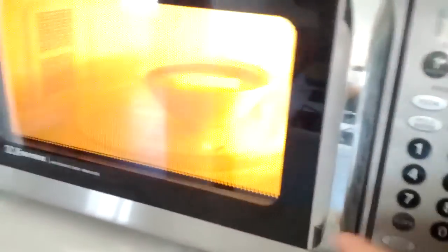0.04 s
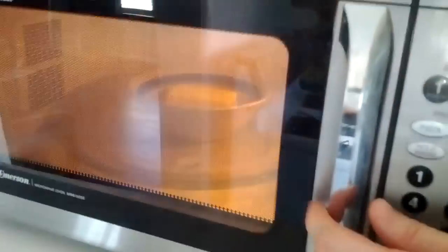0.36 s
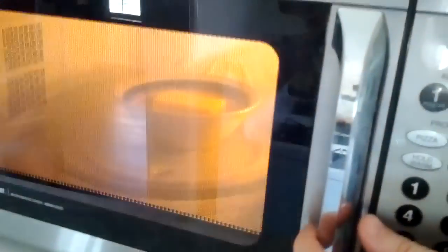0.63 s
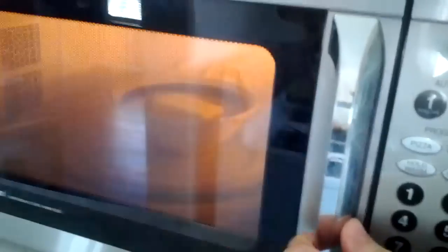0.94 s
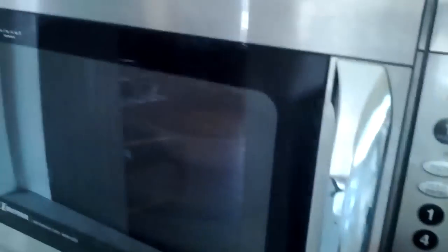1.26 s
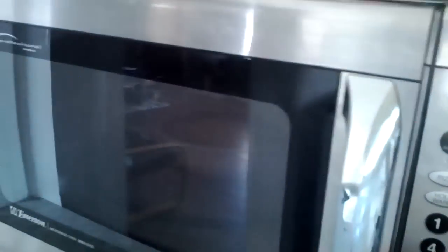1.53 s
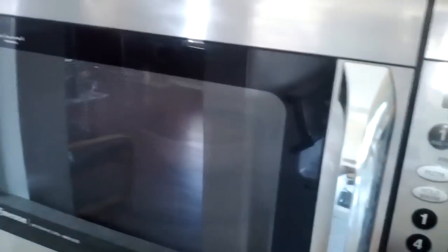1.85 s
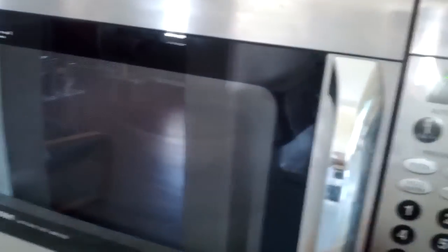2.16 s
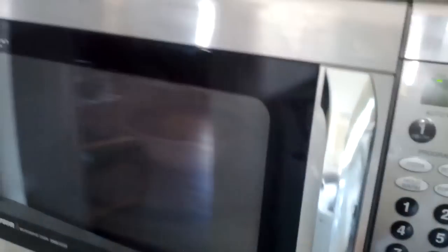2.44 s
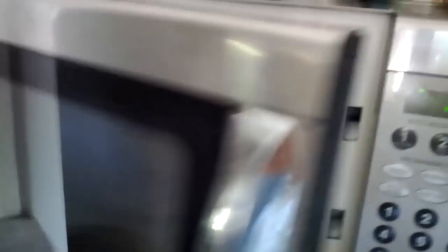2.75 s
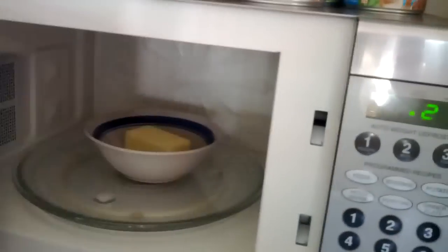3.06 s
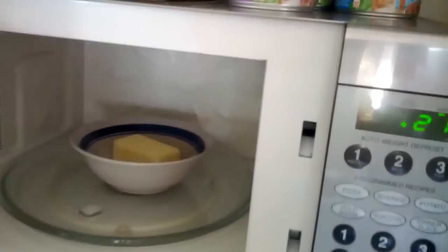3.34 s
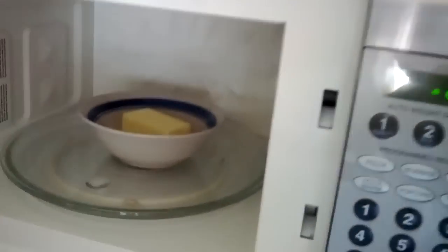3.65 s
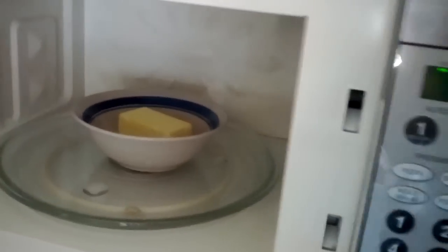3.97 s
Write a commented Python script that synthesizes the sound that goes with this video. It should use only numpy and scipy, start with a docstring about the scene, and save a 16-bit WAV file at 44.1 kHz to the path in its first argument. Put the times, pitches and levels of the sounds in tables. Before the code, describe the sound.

A microwave oven sparks with a loud sizzling buzz, stops, and its door clunks open.

```python
"""Arcing in a microwave oven

An arc, heard from just in front of the oven door in a quiet kitchen, restrikes on every mains cycle.
It drones, thumps the metal cavity and sizzles, flaring now and then. After a second it dies and the
latch clatters open; the door clicks again, rubs under a hand and ticks as it swings wide."""
import sys
import numpy as np
from scipy import signal
from scipy.fft import rfft, irfft
from scipy.io import wavfile

SR = 44100
rng = np.random.default_rng(int(sys.argv[2]) if len(sys.argv) > 2 else 0)


def dump_mix(stems):
    """Bounce the given channels to the path in sys.argv[1] as a 16-bit WAV at rate SR."""
    frames = np.atleast_2d(stems).T  # one column per channel
    limited = np.clip(frames, -1, 1)  # hard clip at full scale
    pcm = np.round(limited * 32767).astype(np.int16)
    wavfile.write(sys.argv[1], SR, pcm)


N = 176400
TIME, BIN_HZ = np.arange(N) / SR, np.fft.rfftfreq(N, 1 / SR)
MAINS_HZ, STRIKE_S, SPRAY_PEAK_S = 60, .0016, 0.001
ARC_FADE_DB_PER_S, FLARE_DECAY_S = 178, 0.0072
FLOOR_DB, EDGE_HZ = -53, 15900

# Room rumble. Each row: frequency in Hz, relative spectral density in dB.
FLOOR_SPECTRUM = [(12, -17), (24, -1), (75, -5), (150, -7), (190, -14), (230, -10.5), (340, -21.5),
                  (850, -24.5), (1800, -32.5), (3500, -39.5), (7000, -41.5), (11000, -37.5), (16000, -47)]
# Its envelope. Each row: time in seconds, level in dB above FLOOR_DB.
FLOOR_ENVELOPE = [(1.2, 8), (2, 2.64), (4, 1)]
# Kitchen reverberation. Each row: frequency in Hz, T60 in seconds.
KITCHEN_T60 = [(100, 1), (600, 0.72), (2000, 0.4), (6000, 0.35), (15000, 0.17)]
# Hand rubs. Each row: start and length in seconds, level in dB, centre in Hz.
HAND_RUBS = [(2.182, 0.072, -55.5, 6500), (2.754, 0.039, -61.5, 8000), (3.421, 0.058, -64, 2870),
             (3.5, 0.053, -58, 9600), (3.938, 0.07, -56, 7500)]
# Latch and door blows. Each row: start in seconds, relative body, clack and tick levels in dB.
LATCH_BLOWS = [(1.0355, -36, -35.5, -29.5), (1.058, -20, -18, -18), (1.0665, -20, -18, -20),
               (1.079, -22, -17, -20), (1.0855, -36, -19.5, -19), (1.091, -20, -20, -16),
               (1.102, -20.5, -28, -35), (1.113, -28, -21, -29), (1.287, -46, -36.5, -48),
               (1.453, -36, -32, -32.5), (2.1135, -38.5, -38, -44), (2.1205, -44, -40.5, -34)]
# Ticks of the swinging door. Each row: start in seconds, relative clack and tick levels in dB.
SWING_TICKS = [(2.439, -57, -52), (2.506, -52, -55.5), (2.6698, -52, -61), (2.707, -50.5, -65),
               (2.9483, -67, -49.5), (3.5592, -52, -40.5), (3.6244, -60, -49.5), (3.6868, -69, -54.5),
               (3.943, -57.5, -64)]
# Door spectra. Each row: frequency in Hz, relative spectral density in dB.
BODY_SPECTRUM = [(60, -38), (200, -10), (330, -6.5), (640, -2), (1060, -4), (1400, -11), (2000, -16.5),
                 (6000, -53)]
CLACK_SPECTRUM = [(500, -8), (1400, 1), (2000, 6), (2800, 2.5), (3800, 4.5), (5200, -1), (8000, -13),
                  (16000, -61)]
TICK_SPECTRUM = [(1500, -65), (5000, -4.5), (7000, -1), (9500, 4.5), (12000, 1.5), (14000, -8.5),
                 (16000, -8)]
# Cabinet thuds and hollow knocks. Each row: start in seconds, gain in dB, frequency in Hz.
CABINET_THUDS = [(1.055, -19, 102), (1.091, -18, 105), (1.454, -33.5, 490), (2.198, -34.5, 72)]
# Door and cavity modes. Each row: frequency in Hz, relative level in dB, T60 in seconds.
DOOR_MODES = [(423.5, 4, 0.19), (513, -2.5, 0.079), (669, 3, 0.064), (744, 2.5, 0.11), (915, 2, 0.023),
              (1060, 1.5, 0.031), (1352, -1.5, 0.068), (1910, -13, 0.15), (2540, -14, 0.072),
              (2760, -5, 0.028), (3720, -8.5, 0.031)]
CAVITY_MODES = [(392.5, -4, 0.082), (435, -21, 0.044), (538.3, -15.5, 0.084), (742, -15.5, 0.067),
                (818, -14.5, .1), (1132, -9, 0.059)]
# Arc strength. Each row: time in seconds, relative drone, thump, crackle and sizzle levels in dB.
ARC_ENVELOPE = [(0, -23.5, -28.5, -43, -36.5), (0.042, -10, -17.5, -31, -24),
                (0.075, -14, -20.5, -25.5, -26.5), (0.11, -18, -21.5, -34.5, -30),
                (0.155, -16, -21.5, -27, -50.5), (0.178, -25.5, -25.5, -45, -30),
                (0.215, -19, -25, -33, -27), (0.26, -14, -18.5, -29, -28), (0.362, -13, -23.5, -33, -23),
                (0.395, -21.5, -27.5, -43.5, -30.5), (0.443, -15.5, -18.5, -24, -23),
                (0.511, -15.5, -20, -32.5, -24), (0.565, -14.5, -18.5, -35.5, -31.5),
                (0.62, -13.5, -18.5, -29.5, -25.5), (0.7, -13, -21, -32, -28),
                (0.755, -17.5, -21, -34, -39.5), (0.798, -12.5, -17, -22.5, -32),
                (0.871, -14, -17, -29, -21.5), (0.938, -16, -19.5, -35, -34),
                (0.966, -20, -27.5, -29.5, -15), (0.998, -33, -24.5, -43.5, -77),
                (1.03, -26.5, -30, -50, -51)]
# Flaring strikes. Each row: start in seconds, relative thump, crackle and sizzle levels in dB.
ARC_FLARES = [(0.0518, -13.5, -23.5, -17), (0.1348, -14.5, -45.5, -24.5), (0.1498, -31.5, -33.5, -22),
              (0.2331, -15, -33.5, -16), (0.267, -14.5, -30.5, -19), (0.4856, -14, -18.5, -20),
              (0.5336, -16, -21, -15.5), (0.587, -23, -26.5, -22), (0.65, -16, -33, -20),
              (0.716, -23, -26, -14), (0.7181, -13, -22.5, -10.5), (0.7686, -17.5, -37.5, -21),
              (0.784, -44, -34, -16), (0.8001, -17, -18.5, -21.5), (0.8175, -69.5, -41, -13.5),
              (0.8864, -38, -35, -20.5), (0.9195, -38.5, -21, -20.5)]
# Drone tones. Each row: multiple of the mains frequency, relative level in dB.
DRONE_HARMONICS = [(1, -12), (2, -7), (3, -21.5), (4, -33), (9, -24)]
# Arc spectra. Each row: frequency in Hz, relative spectral density in dB.
RUMBLE_SPECTRUM = [(20, -32.5), (45, -29), (65, 3), (95, -5), (130, -5), (172, 4), (203, -11), (228, -6),
                   (262, -19.5), (400, -38.5), (2000, -85)]
THUMP_SPECTRUM = [(100, -46), (260, -19), (310, -4.5), (400, 3), (470, -2), (620, -14.5), (750, -9.5),
                  (950, -18), (1150, -17.5), (1400, -27.5), (4000, -43)]
CRACKLE_SPECTRUM = [(400, -17.5), (1200, -0.5), (2000, 2), (2450, 1), (2850, -3.5), (3500, 2), (4400, -9),
                    (5500, -7), (8000, -20), (16000, -41.5)]
SIZZLE_SPECTRUM = [(1500, -35.5), (5500, -7.5), (6600, -3), (7400, -4), (9300, 0.5), (10800, 0.5),
                   (12500, -2.5), (15800, -8.5)]
# The arc's singing hiss and its whistle. Each row: time in seconds, centre in Hz.
SING_GLIDE = [(.08, 11400), (0.248, 8700), (0.459, 10900), (.68, 10500), (.725, 9400), (0.821, 11100),
              (.95, 8900)]
WHISTLE_GLIDE = [(0.287, 3610), (0.37, 3820), (.434, 3290), (.578, 3320), (.656, 3750), (.76, 3560)]


def amp(db):
    """Amplitude grows tenfold per 20 dB."""
    return 10 ** (np.asarray(db) / 20)


def unit_rms(x):
    """Normalisation to rms 1."""
    return x / np.sqrt(np.mean(x ** 2) + 1e-20)


def unit_energy(x):
    """Normalisation to energy 1."""
    return x / np.sqrt(np.sum(x ** 2) + 1e-20)


def at_hz(points, hz):
    """Interpolation on a log-frequency axis."""
    f, value = np.transpose(points)
    return np.interp(np.log(hz + 1), np.log(f + 1), value)


def over_time(rows, column=1):
    """Linear interpolation of one column in time."""
    rows = np.array(rows)
    return np.interp(TIME, rows[:, 0], rows[:, column])


def add(mix, start_s, sound):
    """Superposition of a sound on the mix."""
    part = mix[max(round(start_s * SR), 0):][:len(sound)]
    part += sound[:len(part)]


def through(x, response):
    """Convolution with an impulse response."""
    return signal.fftconvolve(x, response)[:N]


def colour(x, spectrum, size=8192):
    """Minimum-phase filtering by a response of energy 1 with the given spectrum."""
    log_gain = np.log(amp(at_hz(spectrum, abs(np.fft.fftfreq(size, 1 / SR)))))
    response = np.fft.ifft(np.exp(np.conj(signal.hilbert(log_gain)))).real
    return through(x, unit_energy(response[:size // 2]))


def burst(decay_s):
    """Noise decaying exponentially from rms 1."""
    t = TIME[:SR // 4]
    return rng.standard_normal(len(t)) * np.exp(-t / decay_s)


def ring(modes):
    """Free vibration is a sum of damped modes."""
    t = TIME[:SR // 2]
    return unit_energy(sum(amp(db - 60 * t / t60) * np.sin(2 * np.pi * hz * t) * rng.choice([-1, 1])
                           for hz, db, t60 in modes))


def wander(rate_hz):
    """Low-passed noise gives a slow fluctuation of rms 1."""
    return unit_rms(irfft(rfft(rng.standard_normal(N)) * np.exp(-(BIN_HZ / rate_hz) ** 2), N))


def resonate(x, hz, width_hz):
    """A moving resonance by heterodyning: shift down, low-pass twice, shift back."""
    carrier = np.exp(2j * np.pi * np.cumsum(hz) / SR)
    pole = np.exp(-np.pi * width_hz / SR)
    once = signal.lfilter([1 - pole], [1, -pole], x / carrier + 1e-18)
    twice = signal.lfilter([1 - pole], [1, -pole], once)
    return (carrier * twice).real * np.sqrt(8 / (1 - pole))  # keeps the level of white noise


def background():
    """Noise weighted to low frequencies is the room's rumble, which eases after a second."""
    noise = irfft(rfft(rng.standard_normal(N)) * amp(at_hz(FLOOR_SPECTRUM, BIN_HZ)), N)
    return unit_rms(noise) * amp(FLOOR_DB + over_time(FLOOR_ENVELOPE))


def kitchen(x, delay_s=0.0056):
    """A diffuse field decays exponentially, each band with its own reverberation time."""
    hz, t, bands = signal.stft(rng.standard_normal(SR), SR, nperseg=256)
    decay = amp(-60 * t / at_hz(KITCHEN_T60, hz)[:, None])
    tail = signal.istft(bands * decay, SR, nperseg=256)[1]
    return through(x, unit_energy(tail * (TIME[:len(tail)] > delay_s)))


def hand_rubs(edge_ratio=1.47):
    """Friction of a hand on the door makes soft swells of band-limited noise."""
    out, t = np.zeros(N), TIME[:SR // 2]
    for start, length, db, hz in HAND_RUBS:
        band = signal.butter(1, [hz / edge_ratio, min(hz * edge_ratio, EDGE_HZ)], "bandpass", fs=SR)
        friction = unit_rms(signal.lfilter(*band, rng.standard_normal(len(t))))
        swell = np.sqrt(abs(np.sin(np.pi * np.minimum(t / length, 1))))
        add(out, start, amp(db) * friction * swell)
    return out


def panels(ring_db=27, thud_decay_s=.022, thud_rise_s=0.0035):
    """Impacts excite the door's modes; the cabinet thuds and knocks as damped sinusoids."""
    out, t = np.zeros(N), TIME[:SR // 2]
    for start, db, _, _ in LATCH_BLOWS:
        add(out, start, amp(db + ring_db) * ring(DOOR_MODES))
    envelope = np.exp(-t / thud_decay_s) - np.exp(-t / thud_rise_s)
    for start, db, hz in CABINET_THUDS:
        add(out, start, amp(db) * np.sqrt(2) * np.sin(2 * np.pi * hz * t) * envelope)
    return out


def hits(rows, column, snap_s, tail_s, tail_db):
    """Each contact is a broadband transient: a sharp snap and a short rattle."""
    out = np.zeros(N)
    for row in rows:
        add(out, row[0], amp(row[column]) * (burst(snap_s) + amp(tail_db) * burst(tail_s)))
    return out


def door(body_db=-4, clack_db=-2):
    """Impacts of latch and door radiate a low body, a mid-range clack and a high tick."""
    body = hits(LATCH_BLOWS, column=1, snap_s=0.0059, tail_s=0.025, tail_db=-0.5)
    clack = hits(LATCH_BLOWS, column=2, snap_s=0.0038, tail_s=0.011, tail_db=-6)
    clack += hits(SWING_TICKS, column=1, snap_s=0.0027, tail_s=0.021, tail_db=-6)
    tick = hits(LATCH_BLOWS + SWING_TICKS, column=-1, snap_s=0.0026, tail_s=0.012, tail_db=-3)
    return (amp(body_db) * colour(body, BODY_SPECTRUM) + amp(clack_db) * colour(clack, CLACK_SPECTRUM)
            + colour(tick, TICK_SPECTRUM))


def wall_echoes(x, decay_s=0.02, drift_hz=4, count=4):
    """Reflections inside the metal box change their pattern as the arc moves."""
    phase = 2 * np.pi * drift_hz * TIME
    return sum(through(x * np.cos(phase + offset), unit_energy(burst(decay_s)))
               for offset in np.arange(count) * np.pi / count) / np.sqrt(count / 2)


def flicker(x, depth_db=3, rate_hz=32, count=14):
    """Random amplitude modulation of each band shifts the timbre."""
    spectrum = rfft(x)
    band = np.sqrt(np.minimum(BIN_HZ / EDGE_HZ, 1)) * (count - 1)
    gains = np.array([amp(depth_db * np.clip(wander(rate_hz), -2, 2)) for _ in range(count)])
    gains /= np.sqrt(np.mean(gains ** 2, axis=0))
    return sum(gain * irfft(spectrum * np.maximum(1 - abs(band - k), 0), N)
               for k, gain in enumerate(gains))


def arc_gain(column):
    """The envelope of one arc layer decays exponentially once the power is cut."""
    since_cut_s = np.maximum(TIME - ARC_ENVELOPE[-1][0], 0)
    return amp(over_time(ARC_ENVELOPE, column) - ARC_FADE_DB_PER_S * since_cut_s)


def strikes(depth_db, spread_db, grain_db):
    """Grainy spark noise is amplitude-modulated by the mains, each cycle to its own depth."""
    cycles = (TIME - SPRAY_PEAK_S) * MAINS_HZ
    cycle_db = spread_db * np.clip(rng.standard_normal(N), -2, 1)[np.round(cycles).astype(int)]
    swell = np.cos(np.pi * cycles) ** 2
    noise = rng.standard_normal(N)
    grains = np.minimum(rng.exponential(1, N), 5)
    return unit_rms(noise * amp((depth_db + cycle_db) * swell + grain_db * grains))


def flares(column):
    """A flaring strike throws a spray of sparks that decays exponentially."""
    out = np.zeros(N)
    for row in ARC_FLARES:
        add(out, row[0], amp(row[column]) * burst(FLARE_DECAY_S))
    return out


def arc_drone(waver_db=2.95, rumble_db=-11):
    """Periodic swelling of the plasma radiates mains harmonics; its random flutter adds rumble."""
    phase = 2 * np.pi * MAINS_HZ * (TIME - np.pi * STRIKE_S)
    tones = sum(amp(db) * np.sqrt(2) * np.cos(k * phase) for k, db in DRONE_HARMONICS)
    flutter = colour(strikes(depth_db=1.5, spread_db=-6.5, grain_db=0.5), RUMBLE_SPECTRUM)
    waver = amp(waver_db * wander(rate_hz=6.9))
    return arc_gain(column=1) * (tones * waver + amp(rumble_db) * flutter)


def arc_thumps(rough_db=-7.5, push_db=-13, flare_db=-9, ring_db=-5,
               jitter_s=0.00082, spread_db=3, lag_s=.0015):
    """Each strike is a pressure impulse that excites the cavity's modes."""
    pushes, flare_pushes = np.zeros(N), np.zeros(N)
    impulse = np.sqrt([SR / MAINS_HZ])  # one per cycle gives rms 1
    for k, (late, size) in enumerate(rng.standard_normal((N * MAINS_HZ // SR, 2))):
        start = k / MAINS_HZ + STRIKE_S + lag_s + jitter_s * late
        add(pushes, start, impulse * amp(spread_db * min(size, 1.5)))
    for start, db, _, _ in ARC_FLARES:
        add(flare_pushes, start + lag_s, impulse * amp(db + flare_db))
    rough = strikes(depth_db=-1.5, spread_db=-1.5, grain_db=5)
    drive = arc_gain(column=2) * (amp(push_db) * pushes + amp(rough_db) * rough) + flare_pushes
    return colour(drive, THUMP_SPECTRUM) + amp(ring_db) * through(drive, ring(CAVITY_MODES))


def arc_sparks(crackle_db=-5, sizzle_db=-6, flare_crackle_db=-4, flare_sizzle_db=-3,
               echo_db=-1, sing_db=-5, whistle_db=-10, whistle_waver=0.022):
    """Sparks radiate broadband crackle and sizzle, which drive two gliding resonances."""
    crackle = amp(crackle_db) * arc_gain(column=3) * strikes(depth_db=1, spread_db=2, grain_db=3.5)
    sizzle = amp(sizzle_db) * arc_gain(column=4) * strikes(depth_db=7.5, spread_db=3.5, grain_db=4.5)
    sizzle += amp(flare_sizzle_db) * flares(column=3)
    decorrelated = rng.choice([-1, 1], N) * sizzle
    sing = amp(sing_db) * resonate(decorrelated, over_time(SING_GLIDE), width_hz=3800)
    whistle_hz = over_time(WHISTLE_GLIDE) * (1 + whistle_waver * wander(rate_hz=10))
    whistle = amp(whistle_db) * resonate(crackle, whistle_hz, width_hz=300)
    crackle += amp(flare_crackle_db) * flares(column=2)
    direct = colour(crackle, CRACKLE_SPECTRUM) + colour(sizzle, SIZZLE_SPECTRUM) + sing
    echoes = amp(echo_db) * wall_echoes(direct)
    return whistle + flicker(direct + echoes) / np.hypot(1, amp(echo_db))


def scene(thump_room_db=-19, spark_room_db=-14, door_room_db=-10):
    """Direct sound from the nearby oven superposes on the kitchen's weaker reverberant field."""
    thumps, sparks, latch = arc_thumps(), arc_sparks(), door() + hand_rubs()
    room = kitchen(amp(thump_room_db) * thumps + amp(spark_room_db) * sparks + amp(door_room_db) * latch)
    return (arc_drone() + thumps + sparks + latch + panels() + room + background())[None]


def record(dry):
    """A linear-phase low-pass filter removes the treble above EDGE_HZ."""
    lowpass = signal.firwin(511, EDGE_HZ, window=("kaiser", 9), fs=SR)
    return signal.oaconvolve(dry, lowpass[None], "same")


dry = scene()
out = record(dry)
dump_mix(out)
```